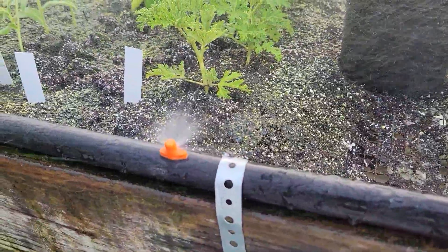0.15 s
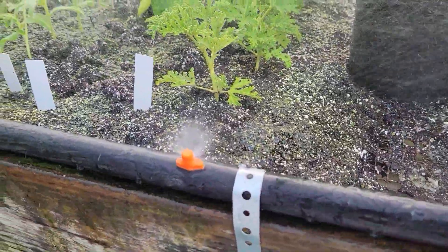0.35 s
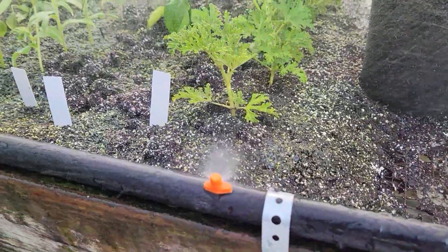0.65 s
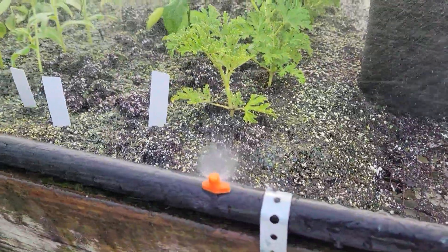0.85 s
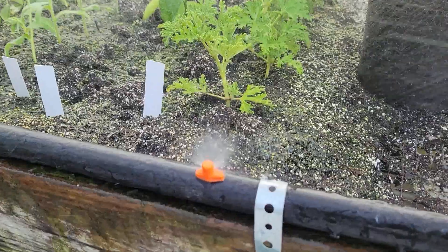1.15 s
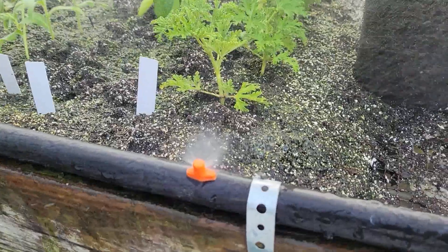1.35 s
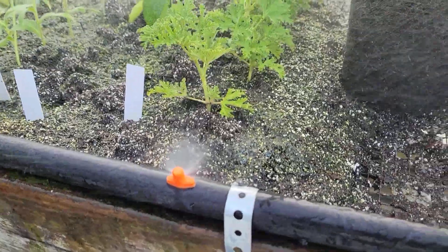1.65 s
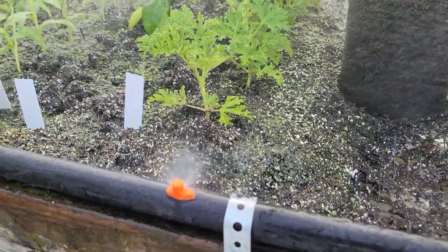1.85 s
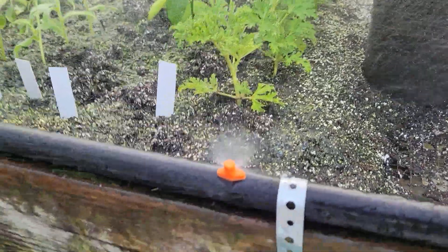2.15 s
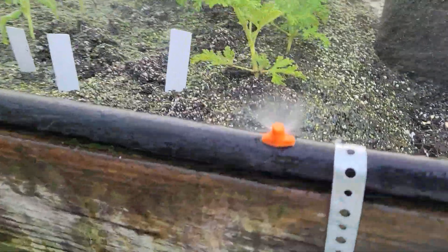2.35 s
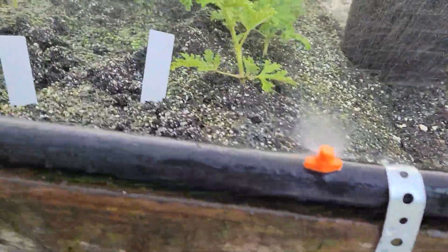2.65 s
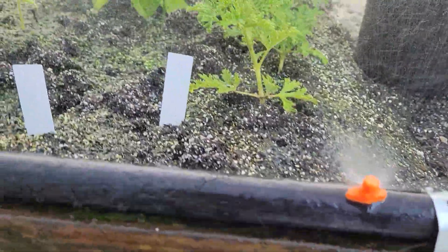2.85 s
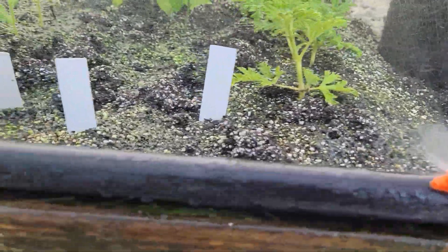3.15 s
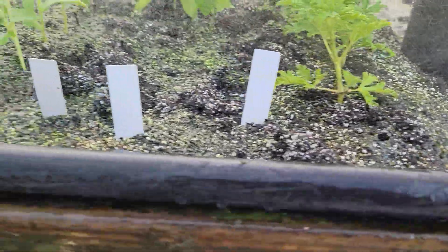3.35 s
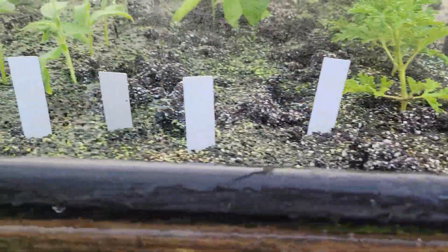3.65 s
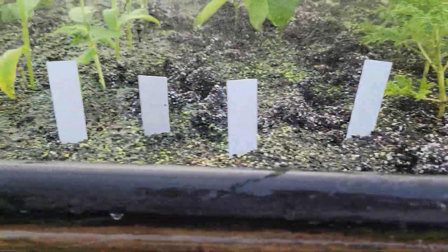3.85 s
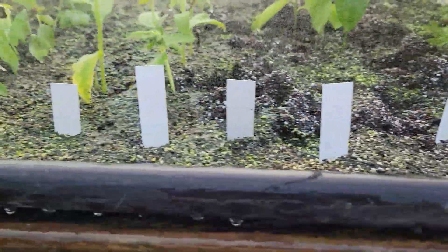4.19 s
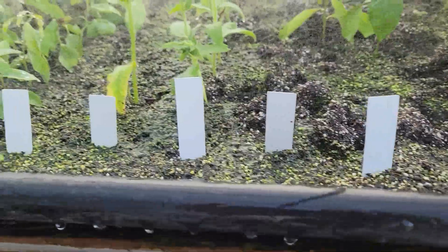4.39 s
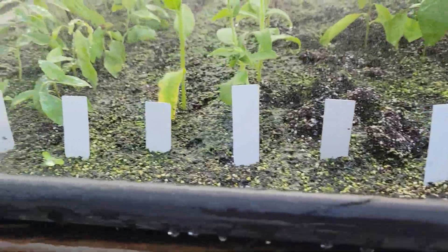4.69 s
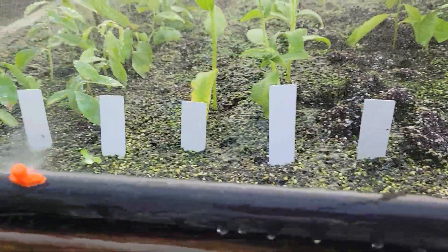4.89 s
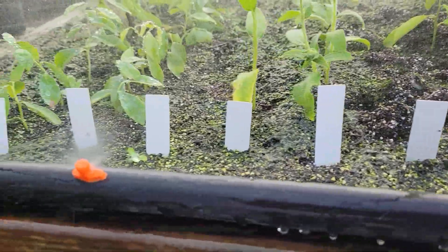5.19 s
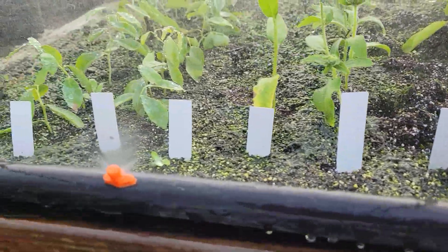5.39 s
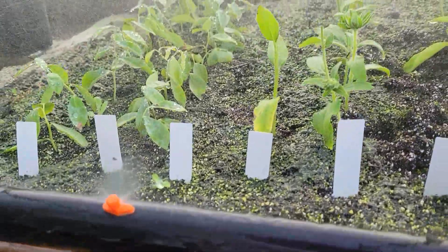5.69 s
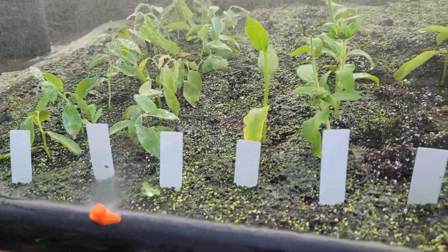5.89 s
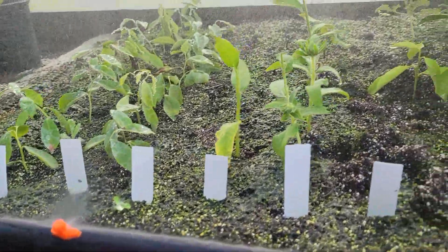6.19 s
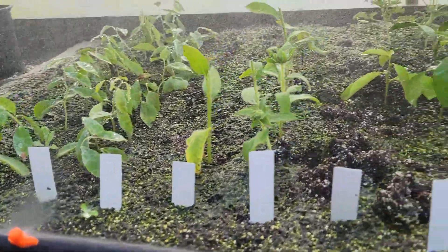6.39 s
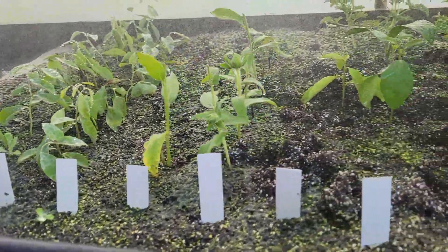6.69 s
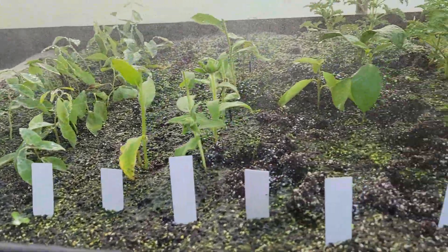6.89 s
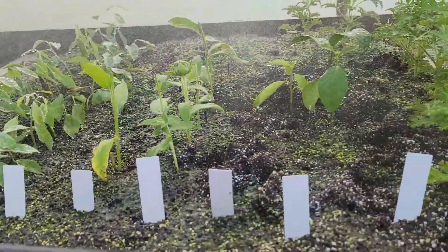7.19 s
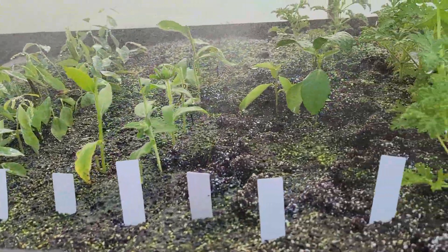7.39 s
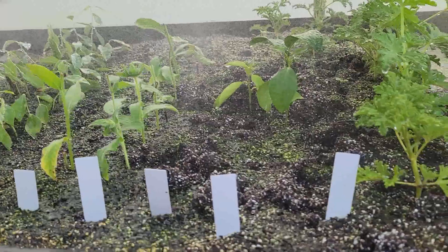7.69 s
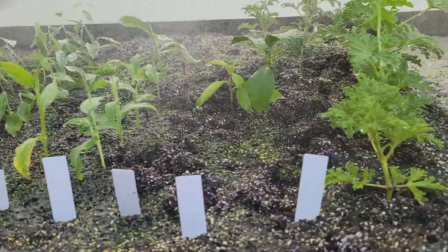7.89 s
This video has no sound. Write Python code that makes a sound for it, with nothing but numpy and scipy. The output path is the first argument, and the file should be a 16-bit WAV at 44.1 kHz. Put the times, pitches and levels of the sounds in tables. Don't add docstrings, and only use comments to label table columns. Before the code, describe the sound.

Fine mist nozzles on a plastic pipe hiss steadily and brightly in a greenhouse, with gritty shoe scuffs, tiny pebble ticks and a low fan hum.

```python
import sys
import numpy as np
from scipy import signal
from scipy.fft import rfft, irfft
from scipy.io import wavfile
from scipy.ndimage import uniform_filter1d, map_coordinates

SR = 44100
rng = np.random.default_rng(int(sys.argv[2]) if len(sys.argv) > 2 else 0)


def transcribe(u):
    v = np.clip(np.atleast_2d(u).T, -1, 1)
    q = np.round(v * 32767).astype(np.int16)
    wavfile.write(sys.argv[1], SR, q)


def to_linear_factor(level_db):
    exponent = np.asarray(level_db, float) / 20
    return 10 ** exponent


N = 354740

FRAME = 1024
HZ = np.fft.rfftfreq(FRAME, 1 / SR)[:, None]
SIDES = np.array([1, -1])[:, None, None]

# time in seconds, place along the pipe in m, distance from the pipe in m,
# turn to the left in degrees, tip upward in degrees.
HAND_PATH = [(0, 0.12, 0.36, 2.5, 1), (.7, 0.078, 0.23, 2.5, -2), (1.4, 0.096, 0.28, 3, -3),
             (2, 0.069, 0.23, 1, 3), (2.4, .07, 0.22, 1.5, -6), (2.68, .08, 0.22, 3, -1.5),
             (2.9, 0.01, 0.31, 0, 4), (3.3, -0.052, 0.2, -5, 1), (3.6, -0.11, 0.52, -5.5, 3),
             (4, -0.14, 0.53, -3.5, 2), (4.7, -0.26, 0.43, 1, 8), (5.1, -0.35, 0.44, 1, 6),
             (5.55, -0.44, 0.41, 3.5, -1), (6.15, -0.42, 0.39, 1.5, 5), (6.5, -0.32, 0.46, 1.5, 11),
             (6.9, -0.25, 0.43, -3, 5), (7.5, -0.31, 0.37, -4.5, -4), (8.04, -0.09, 0.41, -1.5, 7)]


def along(points, hz):
    f, v = np.transpose(points)
    return np.interp(np.log(hz + 1), np.log(f + 1), v)


def curves(rows, t):
    s, *cols = np.transpose(rows)
    return [np.interp(t, s, c) for c in cols]


def unit(x):
    return x / np.sqrt(np.mean(np.abs(x) ** 2) + 1e-20)


def wobble(rate, t):
    knots = rng.standard_normal(int(N / SR * 80))
    return map_coordinates(knots, [t * rate + 2], mode="mirror")


def frames(x):
    return signal.stft(x, SR, nperseg=FRAME, noverlap=FRAME * 3 // 4)[1:]


def sound(z):
    return signal.istft(z, SR, nperseg=FRAME, noverlap=FRAME * 3 // 4)[1][..., :N]


def bump(hz, width):
    return np.exp(-((HZ - hz) / width) ** 2)


def spray(spectrum, patchy_db, spit_db, channels=1):
    burst = unit(uniform_filter1d(rng.standard_normal(N), size=40))
    t, z = frames(rng.standard_normal((channels, N)) * to_linear_factor(spit_db * burst))
    patches = uniform_filter1d(rng.standard_normal(z.shape[1:]), size=12, axis=0)
    patches = uniform_filter1d(patches, size=12, axis=1)
    z = z * to_linear_factor(along(spectrum, HZ) + patchy_db * unit(patches))
    return t, z / np.std(sound(z), axis=-1)[:, None, None]


def placed(z, lag, pan_db, round_lag=0, round_share=0):
    pair = z * to_linear_factor(SIDES * pan_db / 2) * np.exp(-1j * np.pi * SIDES * HZ * lag / SR)
    pair[1] *= 1 + round_share * np.exp(-2j * np.pi * HZ * round_lag / SR)
    return pair


def nozzle(place, spectrum, round_lag, round_share):
    port_gap_m, sound_m_s = 0.1735, 343
    aim_deg, off_aim_db = -18.5, 13.5
    t, z = spray(spectrum, patchy_db=0.52, spit_db=2.0)
    at_m, db, ahead_db, right_db = place
    hand_m, away_m, turn, _ = curves(HAND_PATH, t)
    bearing = np.arctan2(at_m - hand_m, away_m) + np.radians(turn)
    level_db = db - 20 * np.log10(np.hypot(at_m - hand_m, away_m))
    level_db = level_db - off_aim_db * (1 - np.cos(bearing - np.radians(aim_deg)))
    z = z * to_linear_factor(level_db + 0.55 * wobble(9, t))
    lag = port_gap_m * np.sin(bearing) * SR / sound_m_s
    pan_db = ahead_db + right_db * np.sin(bearing)
    return sound(placed(z, lag, pan_db, round_lag, round_share))


def row():
    # time in seconds, level in dB, left-right lean of the fizz in dB.
    wash = [(0, -38.5, 2.5), (.6, -39, 1), (1.5, -37.5, 0), (2, -39, -.5), (2.5, -37, -1), (2.9, -37.5, -3),
            (3.7, -37, 2), (4.4, -38, -5), (5.05, -37.5, -2), (5.76, -38, -1.5), (5.84, -40.5, 1.4),
            (6.3, -40.5, 3), (7.2, -37.5, 0.5), (7.6, -37.5, 1), (8.04, -38, .3)]
    # frequency in Hz, density in dB per Hz.
    mid_colour = [(120, -16), (250, 3.5), (440, 0), (520, 4), (800, -1), (1400, -6), (2200, -0.5),
                  (2700, -4), (3100, 0), (15800, -0.23)]
    # frequency in Hz, density in dB per Hz.
    side_colour = [(120, -26), (300, 0), (550, 2), (800, 1.5), (1400, 3), (2200, -2.5), (3000, 0.5),
                   (15800, 0)]
    lean_db_per_deg, fizz_db_per_deg, edge_db_per_deg = 0.49, 0.31, -0.27
    soil_lift_db, soil_m = 2.5, 0.29

    t, mid = spray(mid_colour, patchy_db=0.86, spit_db=1.1)
    side = to_linear_factor(0.4) * spray(side_colour, patchy_db=0.4, spit_db=0.1)[1]
    body_db, fizz_pan = curves(wash, t)
    _, away_m, turn, tip = curves(HAND_PATH, t)
    fizz = 1 / (1 + (11500 / (HZ + 1)) ** 8)
    flutter = 0.64 * wobble(24, t) + 0.63 * wobble(60, t)
    soil_db = soil_lift_db * 2 * np.exp(-away_m / soil_m) - 0.8
    edge_db = edge_db_per_deg * tip + 0.4
    level_db = body_db + 6 + 0.28 * wobble(9.6, t)
    level_db = level_db + fizz * (fizz_db_per_deg * tip - 0.7 + flutter)
    level_db = level_db + soil_db / (1 + (HZ / 950) ** 6) + edge_db * bump(11900, 900)
    pan_db = (1 - fizz) * lean_db_per_deg * turn + fizz * fizz_pan
    return sound((mid + SIDES * side) * to_linear_factor(level_db + SIDES * pan_db / 2))


def scuffs():
    # peak in seconds, level in dB, length in seconds, sole push over grit in dB.
    drags = [(0.658, -45, 0.02, 6), (.9, -42, .04, -0.5), (1.21, -41, 0.059, 2.5), (1.5, -51, .09, 4),
             (1.602, -39, .04, -8), (1.658, -29.5, .065, -4.5), (1.716, -36, .035, -11),
             (2.2, -29.5, 0.042, -10), (2.249, -35, 0.054, -14), (2.38, -42, 0.11, 0),
             (2.957, -35.5, .04, -3), (3.43, -43, .12, -6), (3.804, -43, .024, 6), (4.58, -38, .046, -16),
             (6.163, -38, 0.064, -17), (6.632, -51, 0.046, 9), (7.83, -52, .07, 3)]
    # frequency in Hz, density in dB per Hz.
    grit_colour = [(150, -28), (400, -12), (900, 1.5), (1500, -1), (2400, 3), (4500, -3.5), (7000, -0.5),
                   (10000, -3.5), (15800, -37.5)]
    # frequency in Hz, density in dB per Hz.
    sole_colour = [(140, -47), (210, 2), (330, -1), (500, -13.5), (1200, -28.5)]
    rise_share, shoe_pan_db = 0.38, -3

    t = np.arange(N) / SR
    size_db = np.minimum(3.5 * rng.exponential(size=N), 12)
    grains = rng.standard_normal((2, N)) * to_linear_factor(size_db) * (rng.random((2, N)) < .12)
    shared, scattered = frames(unit(grains) + 0.68 * rng.standard_normal((2, N)))[1]
    z = shared + SIDES * scattered * 0.81 / (1 + (1500 / (HZ + 1)) ** 4)
    grit = unit(sound(z * to_linear_factor(along(grit_colour, HZ))))
    sole = unit(sound(z * to_linear_factor(along(sole_colour, HZ))))
    out = np.zeros((2, N))
    for s, db, length, push_db in drags:
        spread = length * np.where(t < s, rise_share, 1 - rise_share)
        drag = np.exp(-((t - s) / spread) ** 2 / 2)
        out += to_linear_factor(db + SIDES[:, 0] * shoe_pan_db / 2) * drag * (grit + to_linear_factor(push_db) * sole)
    return np.array([np.roll(out[0], 8), out[1]])


def ticks():
    # start in seconds, peak in dB, pitch in Hz, left-right lean in dB.
    pebbles = [
        (1.504, -40, 3000, 5),
        (1.644, -24, 1500, -4),
        (1.69, -24, 2450, 0),
        (1.91, -25.5, 3000, 3),
        (2.369, -24, 13500, 6),
        (2.3725, -28, 13500, 6),
        (2.77, -21.5, 2700, 6),
        (2.962, -23, 1520, -3),
        (4.576, -22, 2200, -3),
        (6.158, -24, 2210, 3),
    ]
    out, t = np.zeros((2, N + 400)), np.arange(400) / SR
    swell = t / .00025
    for s, db, hz, pan_db in pebbles:
        ring = np.sin(2 * np.pi * hz * t) * swell * np.exp(1 - swell)
        out[:, round(s * SR):][:, :400] += to_linear_factor(db + SIDES[:, 0] * pan_db / 2) * ring
    return out[:, :N]


def fan():
    # frequency in Hz, density in dB per Hz.
    rumble_colour = [(15, -47), (25, -6.5), (65, -0.5), (85, 0), (102, -8), (146, -14.5), (177, -11.5),
                     (200, -15), (260, -51), (440, -120)]
    tone_hz = [73.6, 117.3]
    rumble_db, blade_db, motor_db = -53, -59.5, -61
    motor_on_s, motor_rise_s, motor_idle_db = 6.3, .1, -15

    t = np.arange(N) / SR
    idle = (1 - np.tanh((t - motor_on_s) / motor_rise_s)) / 2
    tone_db = blade_db, motor_db + motor_idle_db * idle
    hz = np.fft.rfftfreq(N + 8192, 1 / SR)
    noise = rfft(rng.standard_normal((2, N + 8192)))
    shared, apart = irfft(noise * to_linear_factor(along(rumble_colour, hz)))[:, :N]
    out = to_linear_factor(rumble_db - 2.0) * (unit(shared) + 0.21 * SIDES[:, 0] * unit(apart))
    for f, db in zip(tone_hz, tone_db):
        level = to_linear_factor(db + 1 + 1.1 * wobble(3.2, t))
        out = out + level * np.sin(2 * np.pi * f * t + 1.5 * wobble(4, t))
    return out


def walls(x, ripple_db):
    # frequency in Hz, width in Hz,
    # gain in dB, middle in seconds, half length in seconds.
    surfaces = [
        (1092, 47, 6, .2, 2),
        (3450, 510, 1.5, 2.64, 0.5),
        (2320, 230, -4.5, 2.93, 0.67),
        (2700, 77, -3.5, 7.5, 1.1),
        (910, 56, 6.5, 7.95, .6),
        (230, 40, -6, 6.07, 0.66),
        (7900, 760, 3.5, 6.13, 0.53),
        (15200, 600, 3, 4.4, .5),
    ]
    # frequency in Hz, width in Hz, gain in dB, middle in seconds,
    # half length in seconds.
    palm = (10100, 1100, -3.5, 4.5, 1)
    t, z = frames(x)
    ripple = uniform_filter1d(rng.standard_normal(z.shape), size=2, axis=1)
    ripple = uniform_filter1d(ripple, size=120, axis=2)

    def passing(hz, width, db, s, half):
        return db * bump(hz, width) * np.exp(-((t - s) / half) ** 4)

    z[1] *= to_linear_factor(passing(*palm))
    passed_db = sum(passing(*surface) for surface in surfaces)
    return sound(z * to_linear_factor(ripple_db * unit(ripple) + passed_db))


def scene():
    # place along the pipe in m, level at 1 m in dB, left-right lean in dB when ahead,
    # further lean in dB when fully right.
    first = (0, -50, -4, -9.5)
    second = (-0.65, -42.5, 2.5, 0)
    left_end = (-1.5, -35, 2, 0.1)
    # frequency in Hz, density in dB per Hz.
    first_jet = [(300, -6.5), (700, -3.5), (1500, -4), (3500, 1), (5000, -0.5), (7200, 4.5), (10000, -2),
                 (12000, -0.5), (15800, -14)]
    second_jet = [(300, -7.5), (700, -4), (1500, 0.5), (3500, -7.5), (5000, 2.5), (7500, 3.5),
                  (10000, -5.5), (12000, -9), (15800, -3)]
    far_jet = [(200, -17), (500, -2), (1300, -2.5), (2500, -3.5), (5000, 5), (9000, -4), (15800, -17)]
    near = to_linear_factor(4.5) * nozzle(first, first_jet, round_lag=8.1, round_share=0.2)
    near += to_linear_factor(2.5) * nozzle(second, second_jet, round_lag=8.2, round_share=0.4)
    far = row() + nozzle(left_end, far_jet, round_lag=4, round_share=0.037)
    return walls(far + near + scuffs(), ripple_db=2.0) + ticks() + to_linear_factor(12.5) * fan()


def top_cut(x):
    return signal.sosfilt(signal.butter(12, 15850, fs=SR, output="sos"), x)


def record(dry):
    # frequency in Hz, gain in dB.
    port_colours = [
        [(250, -13), (600, -6.5), (1200, 2), (2400, -4.5), (3500, -5.5), (4450, -13.5), (5600, -10), (7700, -3.5), (9300, -9.5), (11300, -5), (12700, 1.5), (13800, 4), (15000, 7.5), (15800, 1.5)],
        [(250, -13), (600, -6.5), (1200, 0), (2200, -3.5), (3400, -1), (5200, -8.5), (6800, -6), (8100, -7), (9300, -10.5), (11000, -16), (12300, -1.5), (13700, 5.5), (14700, -1), (15800, 1)],
    ]
    top_hz, low_hz = 15800, 40
    coloured = sound(frames(dry)[1] * to_linear_factor([along(port, HZ) for port in port_colours]))
    hz = np.fft.rfftfreq(N + 4096, 1 / SR)
    band = (hz < top_hz) / np.sqrt(1 + (low_hz / (hz + 1)) ** 12)
    mix = irfft(rfft(coloured, N + 4096) * band)[:, :N]
    return top_cut(mix)


dry = scene()
out = record(dry)
transcribe(out)
```